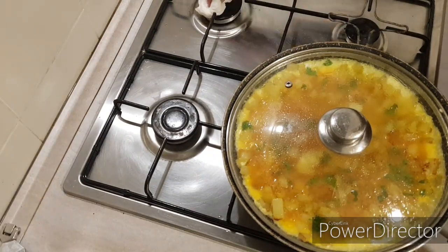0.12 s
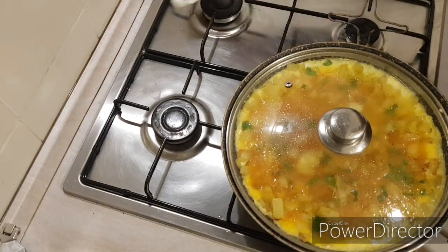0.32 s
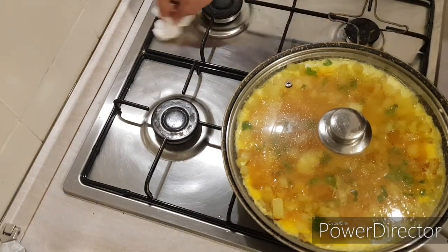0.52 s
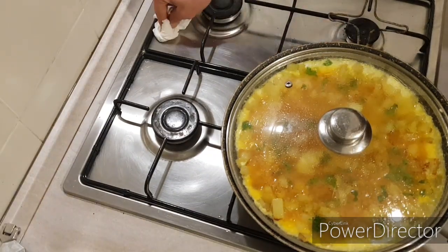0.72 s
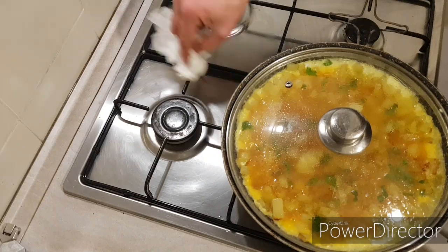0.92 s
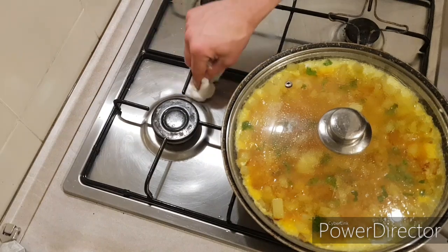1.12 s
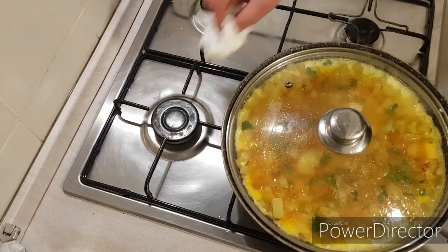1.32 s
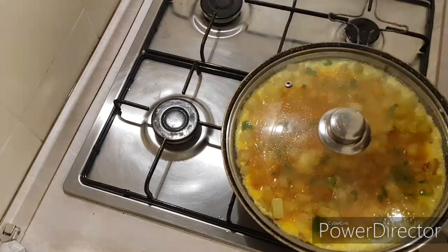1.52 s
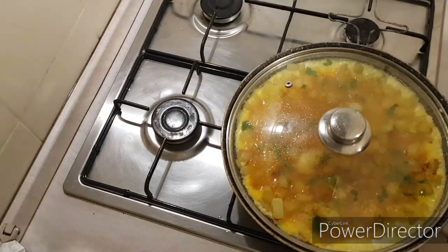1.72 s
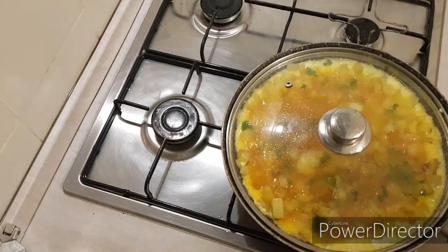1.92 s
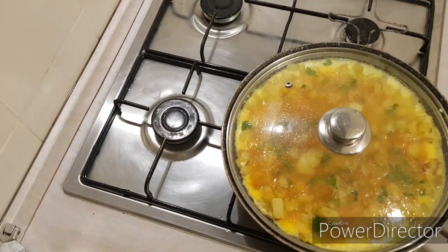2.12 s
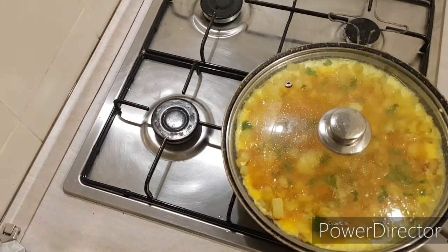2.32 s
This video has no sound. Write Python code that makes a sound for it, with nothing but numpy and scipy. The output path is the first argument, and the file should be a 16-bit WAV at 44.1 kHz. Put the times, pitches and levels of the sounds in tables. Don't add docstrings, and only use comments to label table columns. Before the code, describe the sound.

Close in a small reverberant kitchen, a hand wiping a stove strikes the metal once sharply, then bumps the cabinet dully, slides a cloth and squeaks faintly at the end, while a covered pan hisses quietly.

```python
import sys
import numpy as np
from scipy import signal
from scipy.fft import rfft, irfft
from scipy.io import wavfile
from scipy.ndimage import uniform_filter1d

SR = 44100
rng = np.random.default_rng(int(sys.argv[2]) if len(sys.argv) > 2 else 0)


def gain_from_decibels(decibels):
    exponent = np.asarray(decibels, float) / 20
    return 10 ** exponent


def file_out(sig):
    cols = np.atleast_2d(sig).T
    lim = np.clip(cols, -1, 1)
    pcm = np.round(lim * 32767).astype(np.int16)
    wavfile.write(sys.argv[1], SR, pcm)


N = 110250

# start in seconds, level in dB, contact in seconds, bass in dB, top in Hz.
KNOCKS = [
    (0.0408, -26.5, 0.0028, 3.5, 5660),
    (0.2403, -11, 0.0024, 2.5, 15400),
    (0.5521, -60, 0.00086, -9, 14100),
]
# frequency in Hz, density in dB per Hz.
CRACK_SPECTRUM = [(45, -48), (90, -10), (600, -13.5), (1540, -9.5), (2330, -16), (3940, -18), (5500, -14),
                  (13200, -34.5), (15300, -43)]
# centre in Hz, width in Hz, lift in dB.
CRACK_PEAKS = [(1520, 370, 3), (2950, 870, 7.5), (3900, 1300, 5.5), (5700, 650, 2.5), (8600, 870, 7.5),
               (10400, 510, 11.5), (12640, 1200, 17)]
# frequency in Hz, level in dB, t60 in seconds.
STEEL_MODES = [(43.4, -21.5, 1.1), (103.8, -7.5, 0.31), (143.4, -4, 0.48), (216, -12, 0.4), (256, -2, 0.19),
               (285, -11.5, 0.386), (393, -3, 0.32), (447, -5, 0.22), (570, -11.5, 0.42), (592.3, -5, 0.64),
               (618, -22.5, 0.31), (760, -7.5, 0.17)]
# frequency in Hz, level in dB, t60 in seconds.
GRATE_MODES = [(1520, 2, 0.13), (2030, -19, 0.26), (2720, -24, 0.15), (3150, -34, 0.5), (3740, -36, 0.57),
               (3944, 12.5, 0.056), (4440, -25, 0.11), (5410, -20, 0.66), (5800, -6, 0.053),
               (6940, -36, 0.19), (8560, -18, 0.2), (10300, -24, 0.19), (13700, -12, 0.14)]
# start in seconds, level in dB, contact in seconds, brightness in dB per
THUDS = [
    (0.657, -37.5, 0.027, -8, 0.6),
    (0.696, -45.5, 0.032, -2, 0.63),
    (0.762, -53.5, 0.013, -5.5, 0.22),
    (1.131, -24.5, 0.017, 2, 0.55),
    (1.89, -64, 0.024, -2.5, 0.79),
    (2.302, -47, 0.042, -0.5, 0.83),
    (2.385, -53.5, 0.023, 0.5, 0.77),
]
# frequency in Hz, level in dB, t60 in seconds.
CABINET_MODES = [(42.6, -1, 0.27), (71.5, 3.5, 0.38), (95, 3, 0.35), (118.4, -7, 0.59), (146, -7.5, 0.48),
                 (262.4, 4.5, 0.3), (291.4, -2.5, 0.3), (319.5, -6.5, 0.44), (397, -8, 0.21),
                 (432, -6.5, 0.38), (607.3, -7.5, 0.18), (691, -7, 0.2), (883, -11, 0.27)]
# frequency in Hz, density in dB per Hz.
PUFF_SPECTRUM = [(29, -43), (50, 9.5), (292, 3.5), (690, -13), (1170, -17.5), (2890, -24), (4660, -32),
                 (15000, -28.5)]
SLIDE_STARTS_S = [0.021, 0.051, 0.156, 0.666, 0.691, 0.701, 0.711, 0.851, 0.861, 1.021, 1.041, 1.136, 1.401,
                  1.971, 2.001, 2.061, 2.201, 2.301, 2.311, 2.346, 2.391, 2.461]
# length in seconds, level in dB, centre in Hz, width in Hz.
SLIDES = [(0.041, -46, 234, 190), (0.085, -47.5, 480, 580), (0.06, -40.5, 140, 740), (0.083, -55, 45, 25),
          (0.101, -58.5, 260, 17), (0.304, -57, 710, 5700), (0.14, -56, 1117, 130), (0.082, -71, 66, 82),
          (0.096, -58, 1140, 340), (0.105, -49.5, 7500, 18000), (0.1, -62, 380, 110),
          (.071, -72, 11000, 13000), (0.14, -55.5, 135, 194), (0.084, -54.5, 570, 1160),
          (0.237, -61.5, 1900, 2400), (0.099, -56.5, 300, 930), (0.095, -61, 370, 560),
          (.221, -45, 650, 2000), (.221, -52, 2900, 7200), (0.04, -53, 1600, 6400), (0.032, -53, 260, 59),
          (.081, -44, 9200, 20000)]
# start in seconds, length in seconds, level in dB, pitch in Hz,
# beat in Hz.
SQUEAKS = [
    (0.012, 0.053, -51, 1430, 93),
    (2.215, 0.025, -52, 1524, 86),
    (2.345, 0.0063, -41.5, 995, 85),
    (2.348, 0.021, -39.5, 1117, 88),
    (2.349, 0.013, -39.5, 1562, 92),
    (2.432, 0.049, -41.5, 1520, 48),
]
# multiple of the pitch, level in dB.
SQUEAK_PARTIALS = [(1, 1), (1.55, -13), (4.1, -24), (5.45, -14.5), (6.5, -15)]
# frequency in Hz, t60 in seconds.
KITCHEN_T60 = [(80, 0.73), (210, 0.48), (560, 0.53), (1470, 0.51), (3880, 0.4), (10200, 0.34)]
# frequency in Hz, density in dB per Hz.
HISS_SPECTRUM = [(24, -54), (40, -12), (653, -17), (778, -3.5), (1160, -11), (1410, -0.5), (2060, -15.5),
                 (3650, -5), (15500, -19)]
# centre in Hz, width in Hz, lift in dB.
PAN_PEAKS = [(96, 35, 13), (796, 460, 1), (1353, 104, 3.5), (1550, 20, 7), (1752, 100, 8.5), (3524, 41, 8),
             (3540, 94, 4.5), (5350, 130, 7.5), (7000, 68, 2), (7200, 74, -2), (10020, 140, 7),
             (11550, 270, 6.5), (12370, 780, 10), (12920, 170, 8.5), (3160, 550, -5), (5930, 1460, -4.5),
             (15000, 990, 4.5)]
# frequency in Hz, correlation as a ratio.
HISS_LIKENESS = [(60, 0.91), (240, 0.51), (950, -0.014), (3770, -0.14), (15000, 0.057)]
# frequency in Hz, left minus right in dB.
HISS_BALANCE = [(60, 1.5), (240, 7.5), (950, 2), (3770, -0.5), (15000, 4)]

WOBBLE, WOBBLE_HZ, GRATE_BLUR = 0.35, 16, 4
STEEL_DB, STEEL_DAMP, RING_PER_DB = -12, 0.68, 0.14
CRACK_RISE_S, CRACK_FALL, CRACK_TAIL = 0.00067, 2.6, 0.07
APART_HZ, TREBLE_LEAN_DB = 740, 2.5
PUFF_DB = -1.5
EDGE_S, JUDDER_DB, SQUEAK_BEAT = 0.006, 3.5, 0.62
NEAR_PAN_DB, LAG_S = 1.4, 0.000035
WET_DB, WET_LEAN_DB, MONO_HZ = -6, 0.3, 300
HISS_DB, PATCHY_DB, SWELL_DB = -49, 2, 0.4
FIZZ_DB, FIZZ_PER_S, POP_SPREAD_DB = -92, 410, 3.5
CEILING, EDGE_HZ = 1.4, 15560


def evened(x):
    return x / np.sqrt(np.mean(x ** 2) + 1e-20)


def read(points, hz):
    f, value = np.transpose(points)
    return np.interp(np.log(hz + 1), np.log(f + 1), value)


def coloured_db(points, peaks, hz):
    return read(points, hz) + sum(db / (1 + (2 * (hz - f) / w) ** 2) for f, w, db in peaks)


def lowpass(x, hz):
    return signal.sosfilt(signal.butter(2, hz, fs=SR, output="sos"), x)


def add(mix, start_s, sound):
    part = mix[..., round(start_s * SR):][..., :sound.shape[-1]]
    part += sound[..., :part.shape[-1]]


def tinted(points, size, peaks=()):
    colour_db = coloured_db(points, peaks, np.fft.rfftfreq(size, 1 / SR))
    return evened(irfft(rfft(rng.standard_normal(size)) * gain_from_decibels(colour_db), size))


def ring(modes, t, damp=1, tilt_db=0, blur=1):
    settle = 4000
    noise = rng.standard_normal((2, len(modes), len(t) + settle))
    a, b = lowpass(noise, blur * WOBBLE_HZ)[..., settle:]
    hz, db, t60_s = np.transpose(modes)[..., None]
    drift = (evened(a) + 1j * evened(b)) * np.minimum(t / 0.0052, 1)
    wobble = 1 + WOBBLE * np.sqrt(blur) * drift
    level = gain_from_decibels(db + tilt_db * np.log2(hz / 100) - 60 * t / (t60_s * damp))
    return (level * (wobble * np.exp(2j * np.pi * hz * t)).imag).sum(0)


def stroke(t, length_s):
    release = (length_s - t) / (2 * EDGE_S) + 1
    return np.clip(np.minimum(t / EDGE_S, release), 0, 1) ** 2


def knock(level_db, contact_s, bass_db, top_hz):
    t = np.arange(SR // 2) / SR
    u = t / contact_s
    fall = np.exp(-u / CRACK_FALL) + CRACK_TAIL * np.exp(-u / 9)
    burst = np.minimum(t / CRACK_RISE_S, 1) ** 0.2 * fall
    rung = gain_from_decibels(STEEL_DB + RING_PER_DB * level_db) * (1 - np.exp(-u))
    sides = []
    for side in range(2):
        crack = tinted(CRACK_SPECTRUM, len(t), CRACK_PEAKS) * burst
        sides.append(crack + rung * ring(GRATE_MODES, t, STEEL_DAMP, blur=GRATE_BLUR))
    body = np.array(sides)
    low = lowpass(body, APART_HZ)
    high = (body - low) * gain_from_decibels(np.array([[TREBLE_LEAN_DB], [-TREBLE_LEAN_DB]]) / 2)
    bass = low[0] + rung * ring(STEEL_MODES, t, STEEL_DAMP)
    return gain_from_decibels(level_db) * lowpass(high + gain_from_decibels(bass_db) * bass, top_hz)


def thud(level_db, contact_s, tilt_db, ring_time):
    t = np.arange(SR // 2) / SR
    spectrum = [(f, db + tilt_db * np.log2(f / 100)) for f, db in PUFF_SPECTRUM]
    puff = tinted(spectrum, len(t)) * np.exp(-t / (contact_s * 2.3))
    swell = np.minimum(t / (contact_s * 0.44), 1)
    return gain_from_decibels(level_db) * swell * (ring(CABINET_MODES, t, ring_time, tilt_db) + gain_from_decibels(PUFF_DB) * puff)


def slide(length_s, level_db, hz, width_hz):
    t = np.arange(SR // 2) / SR
    judder = gain_from_decibels(JUDDER_DB * evened(uniform_filter1d(rng.standard_normal(len(t)), size=200)))
    friction = judder * rng.standard_normal(len(t))
    turn = np.exp(2j * np.pi * hz * t)
    r = np.exp(-np.pi * width_hz / SR)
    two_poles = np.convolve([1, -r], [1, -r])
    rub = (turn * signal.lfilter([1], two_poles, friction / turn)).real
    return gain_from_decibels(level_db) * evened(rub) * stroke(t, length_s)


def squeak(length_s, level_db, hz, beat_hz):
    t = np.arange(SR // 8) / SR
    waver = 0.01 * evened(uniform_filter1d(rng.standard_normal(len(t)), size=150))
    turns = np.cumsum(hz * (1 + waver)) / SR
    tone = sum(gain_from_decibels(db) * np.sin(2 * np.pi * k * turns) for k, db in SQUEAK_PARTIALS)
    beat = 1 - SQUEAK_BEAT * np.cos(2 * np.pi * beat_hz * t)
    return gain_from_decibels(level_db) * tone * beat * stroke(t, length_s)


def kitchen(x):
    taps = np.zeros((2, SR))
    at = np.arange(200, SR - 20, 20)
    at = at + rng.integers(0, 20, (2, len(at)))
    np.put_along_axis(taps, at, rng.choice([-1., 1.], at.shape), 1)
    hz, t, z = signal.stft(taps, SR, nperseg=512)
    own = hz[:, None] ** 2 / (hz[:, None] ** 2 + MONO_HZ ** 2)
    z[1] = np.sqrt(1 - own) * z[0] + np.sqrt(own) * z[1]
    decay = gain_from_decibels(-60 * t / read(KITCHEN_T60, hz)[:, None])
    tail = signal.istft(z * decay, SR, nperseg=512)[1]
    tail = tail / np.linalg.norm(tail, axis=1)[:, None]
    return signal.fftconvolve(x[None], tail, axes=1)[:, :N]


def fizz():
    size = gain_from_decibels(POP_SPREAD_DB * np.minimum(rng.exponential(1, (2, N)), 4))
    sign = rng.choice([-1, 1], (2, N))
    pops = size * sign * (rng.random((2, N)) < FIZZ_PER_S / SR)
    band = signal.butter(2, [3000, 14000], "band", fs=SR, output="sos")
    return gain_from_decibels(FIZZ_DB) * evened(signal.sosfilt(band, pops))


def simmer():
    frames, hz = N // 512 + 5, np.fft.rfftfreq(2048, 1 / SR)
    a, b, c, d, patches = rng.standard_normal((frames, 1025, 5)).T
    patches = uniform_filter1d(patches, size=14, axis=0)
    patches = evened(uniform_filter1d(patches, size=6, axis=1))
    swell = evened(uniform_filter1d(rng.standard_normal(frames), size=12))
    colour_db = coloured_db(HISS_SPECTRUM, PAN_PEAKS, hz)[:, None]
    same = np.clip(read(HISS_LIKENESS, hz), -1, 1)[:, None]
    lean_db = read(HISS_BALANCE, hz)[:, None] / 2
    left = a + 1j * b
    right = same * left + np.sqrt(1 - same ** 2) * (c + 1j * d)
    z = np.array([left * gain_from_decibels(lean_db), right * gain_from_decibels(-lean_db)])
    z *= gain_from_decibels(colour_db + PATCHY_DB * patches + SWELL_DB * swell)
    hiss = evened(signal.istft(z, nperseg=2048, noverlap=1536)[1][:, :N])
    return gain_from_decibels(HISS_DB) * hiss + fizz()


def scene():
    hand = np.zeros((2, N))
    slides = [(s, *row) for s, row in zip(SLIDE_STARTS_S, SLIDES)]
    for table, source in ((KNOCKS, knock), (THUDS, thud), (slides, slide), (SQUEAKS, squeak)):
        for start_s, *settings in table:
            add(hand, start_s, source(*settings) * np.ones((2, 1)))
    n = np.arange(N)
    late_left = np.interp(n - LAG_S * SR, n, hand[0])
    direct = np.array([late_left * gain_from_decibels(NEAR_PAN_DB), hand[1] * gain_from_decibels(-NEAR_PAN_DB)])
    wet = gain_from_decibels(WET_DB) * kitchen(hand[0]) * gain_from_decibels(np.array([[WET_LEAN_DB], [-WET_LEAN_DB]]))
    return direct + wet + simmer()


def roll_off(x):
    return signal.sosfilt(signal.butter(12, 16160, fs=SR, output="sos"), x)


def record(dry):
    soft = CEILING * np.tanh(dry / CEILING)
    heard = signal.sosfilt(signal.butter(6, 36, "high", fs=SR, output="sos"), soft)
    band_limit = signal.firwin(801, EDGE_HZ, window=("kaiser", 9), fs=SR)
    heard = signal.oaconvolve(heard, band_limit[None], "same")
    return roll_off(heard)


dry = scene()
out = record(dry)
file_out(out)
```